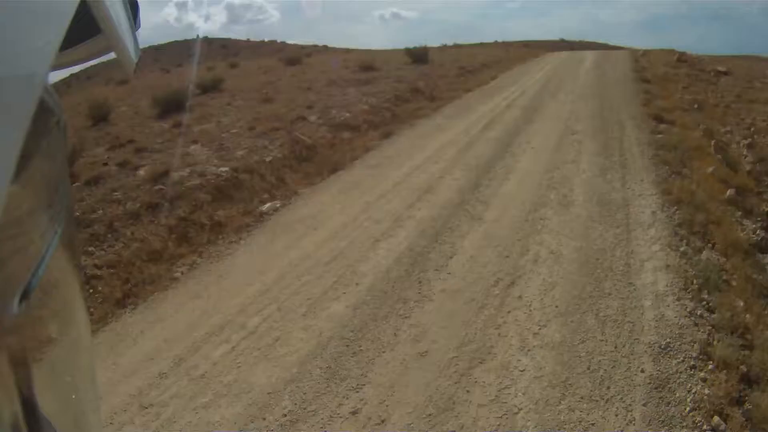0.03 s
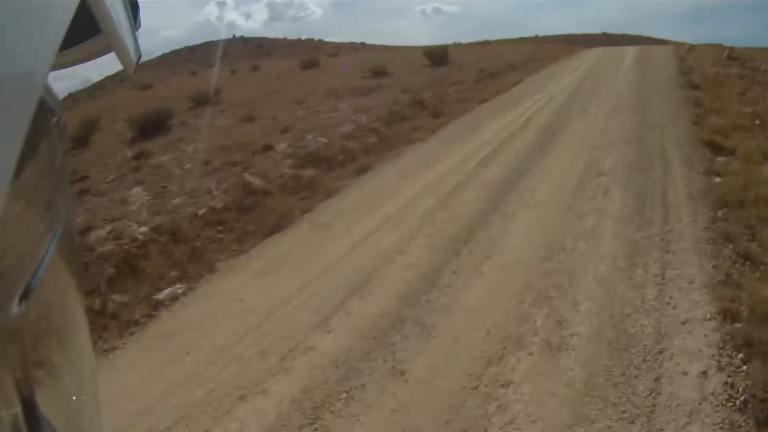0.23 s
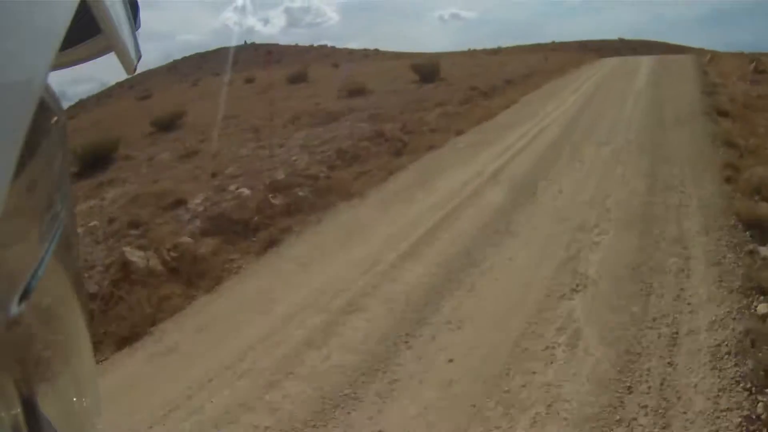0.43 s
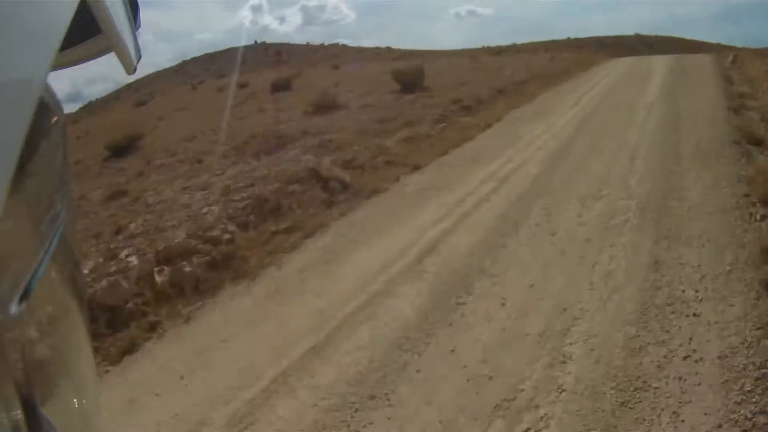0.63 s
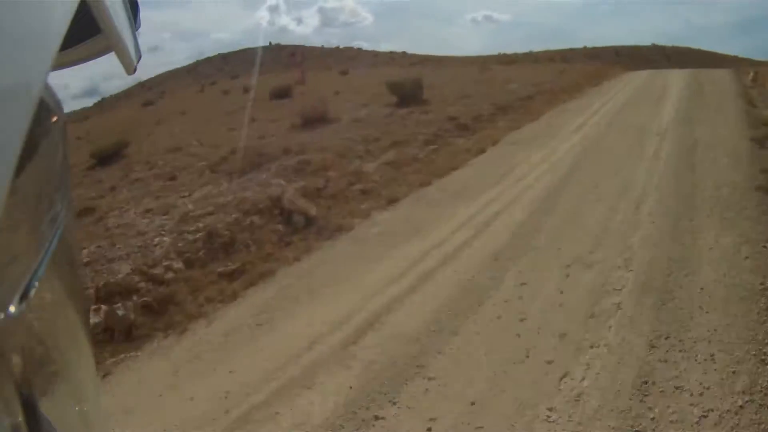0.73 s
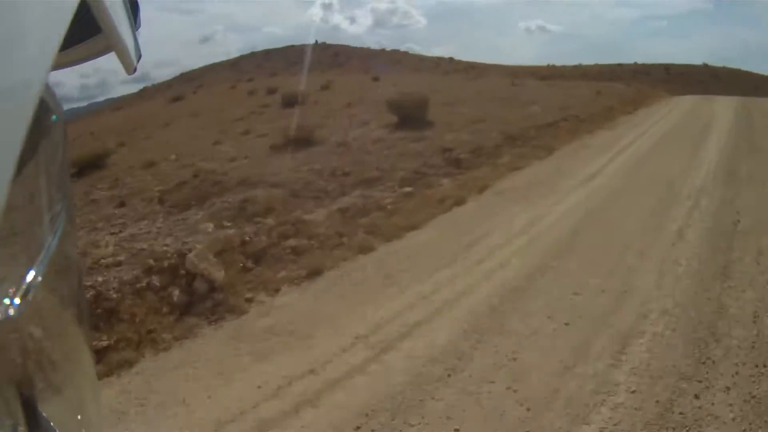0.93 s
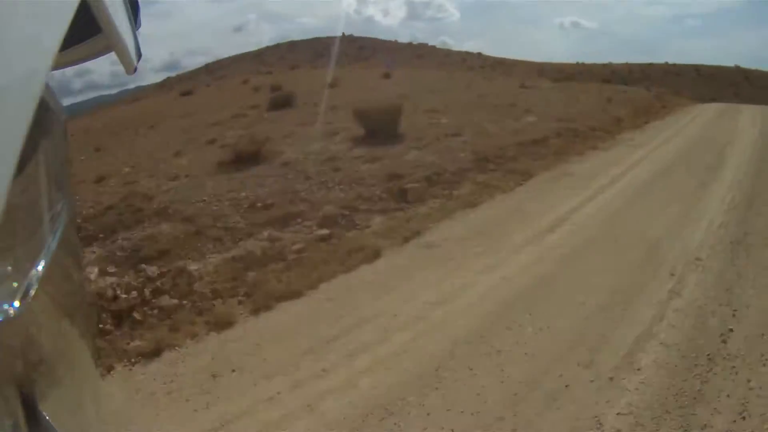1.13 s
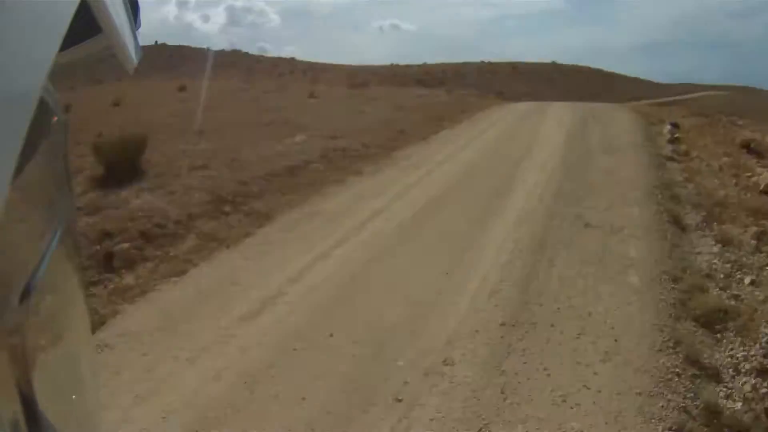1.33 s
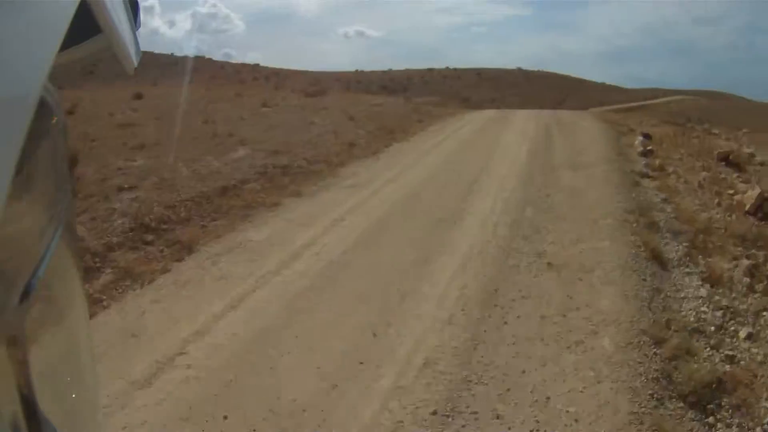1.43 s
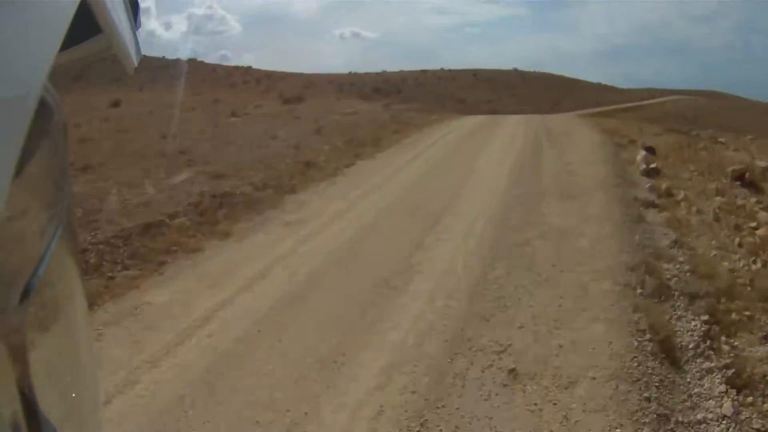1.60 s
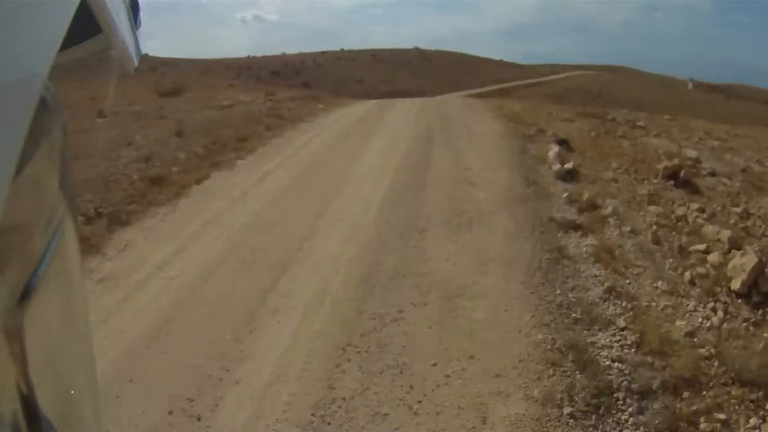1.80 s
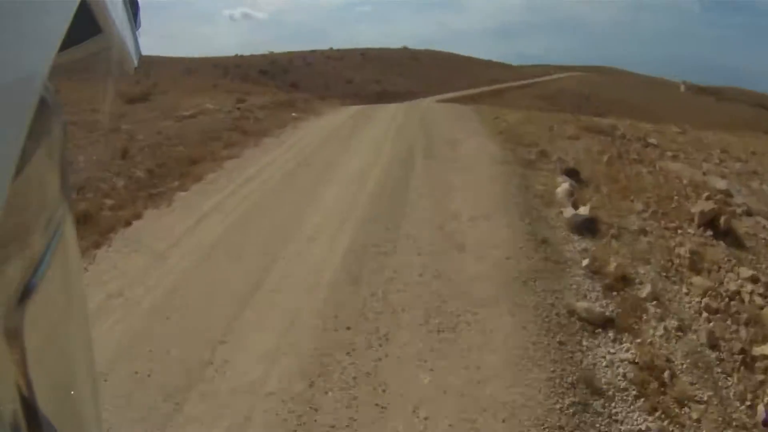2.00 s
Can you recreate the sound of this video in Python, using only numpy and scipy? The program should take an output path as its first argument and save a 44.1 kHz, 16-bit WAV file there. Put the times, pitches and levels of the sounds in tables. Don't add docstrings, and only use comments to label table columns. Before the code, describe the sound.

A single-cylinder motorcycle engine fades in abruptly at 0.12 seconds, thumping about 33 times a second, then softens and slows slightly until 1.0. Revs climb to a peak near 1.36, with stronger hum and metallic ringing, then drop back by 1.65. Valve ticking, jingling parts, bump rattles and dull mount thuds continue under muffled wind, with a gust at 1.4 and a sharp jolt and rattle around 1.9-1.97.

```python
import sys
import numpy as np
from scipy import signal
from scipy.fft import rfft, irfft, next_fast_len
from scipy.io import wavfile
from scipy.ndimage import uniform_filter1d

SR = 44100
rng = np.random.default_rng(int(sys.argv[2]) if len(sys.argv) > 2 else 0)


def boost_factor(decibels):
    exponent = np.asarray(decibels, float) / 20
    return 10 ** exponent


def master(y):
    cut = np.clip(np.atleast_2d(y).T, -1, 1)
    pcm = np.round(cut * 32767)
    wavfile.write(sys.argv[1], SR, pcm.astype(np.int16))


N = 90625


def curve(table, col):
    rows = np.array(table, float)
    return np.interp(np.arange(N) / SR, rows[:, 0], rows[:, col])


def unit(x):
    return x / np.sqrt(np.mean(x ** 2))


def noise():
    return rng.standard_normal(N)


def band(x, hz, width):
    return signal.lfilter(*signal.iirpeak(hz, hz / width, SR), x)


def colour(x, table, top_db_oct=-30):
    size = next_fast_len(len(x))
    octave = np.log2(np.maximum(np.arange(size // 2 + 1) * SR / size, 10))
    points, levels = np.log2(np.array(table)[:, 0]), np.array(table)[:, 1]
    db = np.interp(octave, points, levels)
    db = db + top_db_oct * np.maximum(octave - points[-1], 0)
    db = db - 9 * np.maximum(points[0] - octave, 0)
    cepstrum = irfft(db * np.log(10) / 20, size)
    cepstrum[1:size // 2] *= 2
    cepstrum[size // 2 + 1:] = 0
    return irfft(rfft(x, size) * np.exp(rfft(cepstrum)), size)[:len(x)]


def walk(rate):
    hold = int(SR / rate)
    steps = np.repeat(rng.standard_normal(N // hold + 1), hold)
    return unit(uniform_filter1d(uniform_filter1d(steps, hold), hold)[:N])


# (time [s], firing rate [1/s])
FIRING_RATE = [(.1, 33.4), (.35, 33.3), (.65, 32), (1.0, 30.7), (1.08, 31.3), (1.13, 32.8), (1.255, 35.3),
               (1.31, 36.8), (1.36, 39.3), (1.45, 36), (1.65, 33), (2.05, 32)]


def cycle():
    return np.cumsum(curve(FIRING_RATE, 1)) / SR + .28


# (time [s], exhaust thump [dB], frame hum [dB])
ENGINE_LEVEL = [(.1, -33.5, -63), (.25, -33.5, -51), (.33, -37.5, -46), (.42, -44, -66), (.55, -45, -48.5),
                (.68, -44, -42), (.8, -43, -56), (1.0, -44.5, -45), (1.08, -51.5, -50), (1.13, -45.5, -41),
                (1.255, -42.5, -36.5), (1.305, -40.5, -43), (1.33, -43.5, -47), (1.39, -59, -41),
                (1.43, -47.5, -70), (2.05, -48, -59.5)]
# (frequency [Hz], width [Hz], level [dB])
PIPE_RESONANCES = [(66.5, 33, -10.5), (112, 54, -3.5), (207, 31, 0), (330, 80, 0.5), (437.4, 73, 0.5),
                   (605, 58, 5), (1340, 100, -5.5)]


def exhaust():
    scatter_db, puff_level, puff_turns = 1.2, .022, .2
    turns = cycle()
    strength = boost_factor(scatter_db * rng.standard_normal(100))[turns.astype(int)]
    firing = np.diff(np.floor(turns), prepend=np.floor(turns[0]))
    puff = puff_level * np.exp(-(turns % 1) / puff_turns) * noise()
    drive = strength * (firing + puff)
    pipe = 0
    for k, (hz, width, db) in enumerate(PIPE_RESONANCES):
        pipe = pipe + (-1) ** k * boost_factor(db) * band(drive, hz, width)
    return unit(pipe) * boost_factor(curve(ENGINE_LEVEL, 1))


DRIFT_DB = .6


def hum():
    frame_order, growl_order, high_order = 8, 6, 18
    growl_db, high_db = -3, -7
    angle = 2 * np.pi * cycle()
    thump_db, hum_db = curve(ENGINE_LEVEL, 1), curve(ENGINE_LEVEL, 2)

    throb = 1 + 0.46 * np.cos(2 * angle)
    frame = boost_factor(hum_db + DRIFT_DB * walk(25)) * throb * np.sin(frame_order * angle + 0.69 * walk(14.05))

    high_level = boost_factor(2 * thump_db - thump_db.max() + high_db + 0.64 * walk(22))
    high_hum = high_level * np.sin(high_order * angle + 0.9 * walk(36))
    growl_level = boost_factor(2 * hum_db - hum_db.max() + growl_db + 2.0 * walk(39.7))
    growl = growl_level * np.sin(growl_order * angle + 2.4 * walk(90))
    return np.sqrt(2) * (frame + high_hum + growl)


# (frequency [Hz], width [Hz], level [dB])
CASE_RESONANCES = [(1246, 65, 0), (1472, 94, 0.5), (2050, 83, -5), (2224, 180, 1)]
# (time [s], level [dB])
CASE_LOUDNESS = [
    (.12, -49),
    (.4, -53),
    (.9, -49),
    (1.05, -43),
    (1.33, -45.5),
    (1.42, -50),
    (2.05, -52.5),
]


def case():
    knock = boost_factor(2.0 * np.cos(4 * np.pi * cycle())) * noise()
    rings = 0
    for hz, width, db in CASE_RESONANCES:
        ring = band(band(knock, hz, width), hz, 2 * width)
        rings = rings + boost_factor(db + 1.2 * walk(19.34)) * unit(ring)
    return boost_factor(curve(CASE_LOUDNESS, 1)) * unit(rings)


# (time [s], peak level [dB], decay time [s])
BUMP_RATTLES = [(0.222, -62, 0.0098), (0.257, -56, 0.01), (0.33, -54, 0.014), (0.443, -43, 0.0069),
                (0.573, -48, .012), (0.611, -44, 0.024), (0.76, -52.5, 0.011), (.885, -59, .01),
                (0.833, -56, 0.0098), (0.927, -47, .01), (1.024, -55, 0.01), (1.112, -40, 0.0067),
                (1.162, -55, .008), (1.198, -56, .01), (1.33, -61, 0.0086), (1.375, -52, .01),
                (1.421, -51, 0.0087), (1.46, -61, .008), (1.475, -50, 0.015), (1.524, -53, .008),
                (1.555, -60, .008), (1.587, -52, .008), (1.652, -50, 0.011), (1.709, -45, 0.0065),
                (1.778, -55, 0.02), (1.851, -59, 0.0071), (1.872, -56, 0.016), (1.971, -33.5, 0.012),
                (2.02, -58, 0.012)]


def bumps():
    attack_s, level_db = .0015, -20.5
    t = np.arange(N) / SR
    shake = 0
    for start, db, decay in BUMP_RATTLES:
        rise = np.clip((t - start) / attack_s, 0, 1)
        shake = shake + boost_factor(db + level_db) * rise * np.exp(-np.maximum(t - start, 0) / decay)
    return shake * boost_factor(3.0 * walk(300))


def clatter(loose, swing_db):
    tick_db, tick_turns, follow = 7, 0.068, 1
    since_tick = (2 * cycle() % 1) / 2
    ticks = tick_db * np.exp(-since_tick / tick_turns) * (1 + 0.5 * walk(60.7))
    sound = loose * boost_factor(follow * swing_db + ticks - 3.0) * noise()
    for _ in range(4):
        sound = band(sound, 3270, 1950)
    return boost_factor(4.5 + 12.5) * sound


def coloured_hiss(envelope, spectrum):
    reference = np.std(colour(noise(), spectrum, -23))
    return colour(noise() * envelope, spectrum, -12.0) / reference


# (time [s], level [dB])
GEAR_LOAD = [(.12, -55), (.34, -55.5), (.4, -59.5), (.55, -61.5), (.6, -57.5), (.64, -59.5), (.68, -62.5),
             (.8, -62), (.98, -60.5), (1.08, -58), (1.2, -59), (1.3, -57.5), (1.36, -58.5), (1.42, -65),
             (1.52, -67), (1.75, -67.5), (1.95, -64), (2.05, -65)]
# (frequency [Hz], level [dB per Hz])
GEAR_SPECTRUM = [(500, -6.5), (1000, -6), (1450, -1.5), (2200, -2.5), (2800, -16.5), (3600, -33.5),
                 (4300, -27.5), (5200, -51.5)]
# (frequency [Hz], level [dB per Hz])
JINGLE_SPECTRUM = [(4200, -7.5), (5500, -7.5), (6600, -0.5), (8200, -6), (9300, -12), (9900, -21.5),
                   (10800, -18), (12600, -32)]


def gear():
    body_db, body_follow, body_shake_db = -45, 0.67, 20.5
    jingle_db, pulse_db = -6.5, 0.5
    load_db = curve(GEAR_LOAD, 1)
    swing_db = load_db - load_db.mean()
    flicker_db = pulse_db * np.cos(4 * np.pi * cycle()) + DRIFT_DB * walk(17.3) + 1.74 * walk(150)
    shake = bumps()
    body = boost_factor(body_db + body_follow * swing_db + flicker_db) + shake * boost_factor(body_shake_db)
    loose = boost_factor(load_db + jingle_db + flicker_db + 0.33 * walk(40.0)) + shake
    rolling = coloured_hiss(body, GEAR_SPECTRUM)
    jingle = coloured_hiss(loose, JINGLE_SPECTRUM)
    return clatter(loose, swing_db) + rolling + jingle


# (time [s], peak level [dB], frequency [Hz], time to fall 60 dB [s])
MOUNT_JOLTS = [(.122, -27, 330, .1), (.468, -26, 350, .04), (.5445, -22, 330, .025), (.658, -25, 270, .04),
               (.683, -19, 520, .016), (.745, -25, 300, .04), (.777, -23, 450, .016),
               (.809, -22, 400, .016), (.851, -25, 580, .03), (1.656, -24, 340, .03),
               (1.688, -25, 530, .035), (1.045, -29, 600, .08), (1.096, -25, 560, .04),
               (1.36, -28, 800, .05), (1.392, -25, 600, .04), (1.408, -26, 720, .06),
               (1.424, -22, 370, .045), (1.797, -25, 700, .04), (1.833, -20, 540, .025),
               (1.856, -27, 600, .03), (1.894, -11, 360, .009), (1.982, -29, 185, .2)]


def thuds():
    rise_turns, low_cut_hz = .25, 110
    t = np.arange(N) / SR
    rings = 0
    for start, db, hz, t60 in MOUNT_JOLTS:
        age = np.maximum(t - start, 0)
        decay = np.exp(-np.log(1000) * age / t60)
        rise = np.minimum(age * hz / rise_turns, 1)
        rings = rings - boost_factor(db) * np.sin(2 * np.pi * hz * age) * decay * rise
    return signal.sosfilt(signal.butter(2, low_cut_hz, "high", fs=SR, output="sos"), rings)


# (time [s], level [dB])
GUST_LEVEL = [(.12, -34.5), (.3, -36.5), (.44, -38), (.6, -35.5), (.9, -36), (1.15, -38), (1.3, -40.5),
              (1.365, -37.5), (1.39, -31.5), (1.43, -33.5), (1.46, -35), (1.53, -40), (1.66, -36.5),
              (1.74, -38.5), (1.8, -33.5), (1.9, -35), (2.0, -38), (2.05, -35.5)]
# (frequency [Hz], level [dB per Hz])
WIND_SPECTRUM = [(30, -26.5), (65, -20), (130, -10.5), (270, -6), (400, -4.5), (1000, -12.5), (1800, -18.5),
                 (3000, -33)]


def wind():
    eddies_per_s, scatter_db, eddy_db, rush_db = 900, 6, -4, -1
    chance = rng.random((3, N))
    hit = chance[0] < eddies_per_s / SR
    push_or_pull = np.sign(chance[1] - .5)
    strength = boost_factor(-scatter_db * np.log(chance[2] + 0.054))
    eddies = colour(hit * push_or_pull * strength, WIND_SPECTRUM)

    air, shared = colour(noise(), WIND_SPECTRUM), walk(30.36)
    rush = 0
    for hz in 35 * 2 ** np.arange(0, 7, .5):
        rush = rush + band(air, hz, hz / 2) * boost_factor(0.58 * shared + 2.04 * walk(12.04))
    return boost_factor(curve(GUST_LEVEL, 1)) * (boost_factor(eddy_db) * unit(eddies) + boost_factor(rush_db) * unit(rush))


def hiss():
    return boost_factor(-90) * band(noise(), 11000, 5000)


def muffle(x):
    return signal.sosfilt(signal.butter(4, 1900, fs=SR, output="sos"), x)


def scene():
    low = muffle(exhaust() + thuds())
    return (low + hum() + case() + gear() + wind() + hiss())[None]


def roll_off(x):
    return signal.sosfilt(signal.butter(12, 12750, fs=SR, output="sos"), x)


def record(dry):
    ceiling, start_s, fade_s = .25, .116, .011
    soft = ceiling * np.tanh(dry / ceiling)
    fade = np.clip((np.arange(N) / SR - start_s) / fade_s, 0, 1)
    return roll_off(soft * fade)


dry = scene()
out = record(dry)
master(out)
```